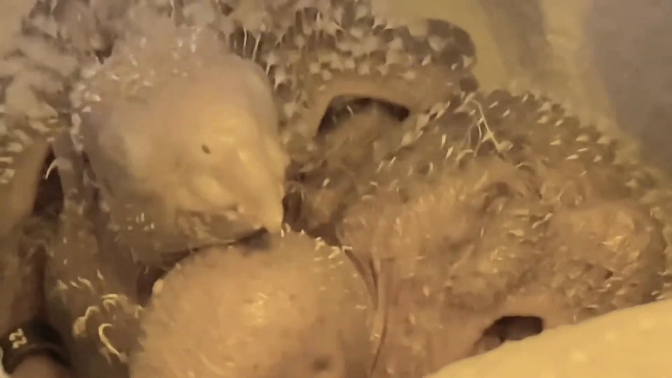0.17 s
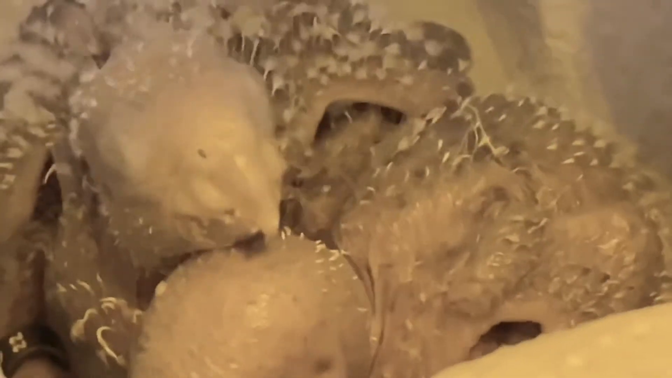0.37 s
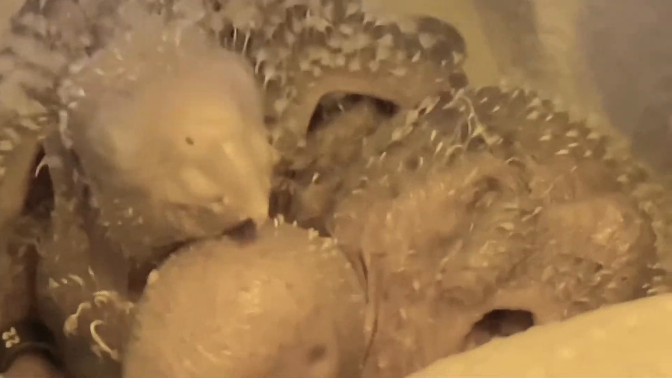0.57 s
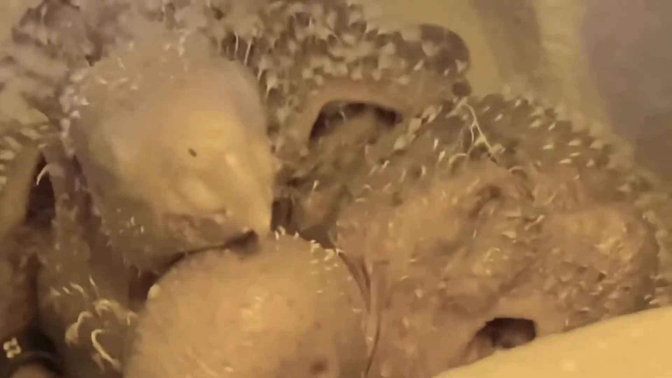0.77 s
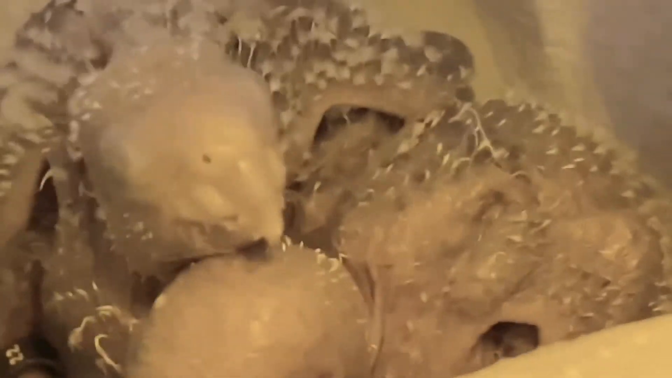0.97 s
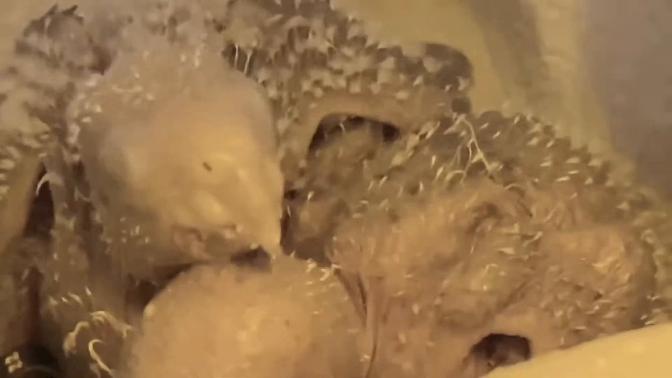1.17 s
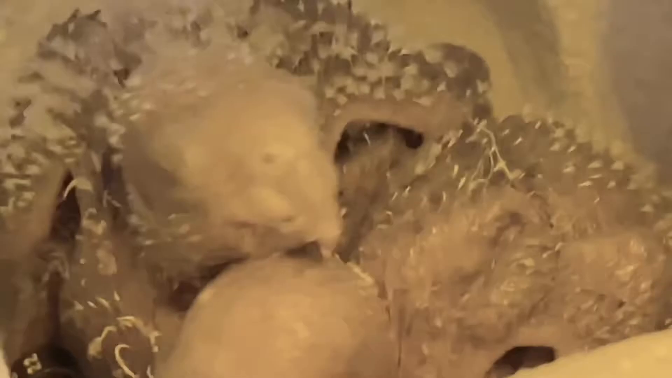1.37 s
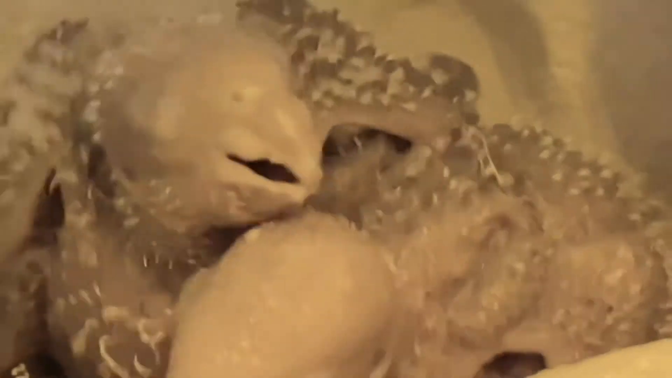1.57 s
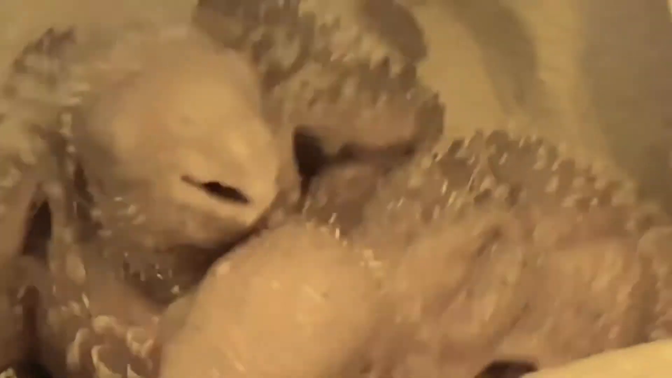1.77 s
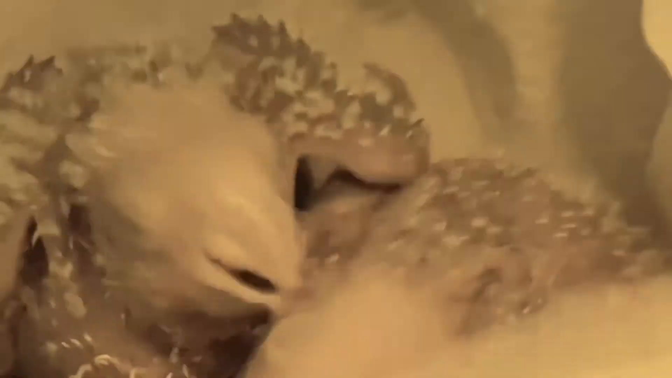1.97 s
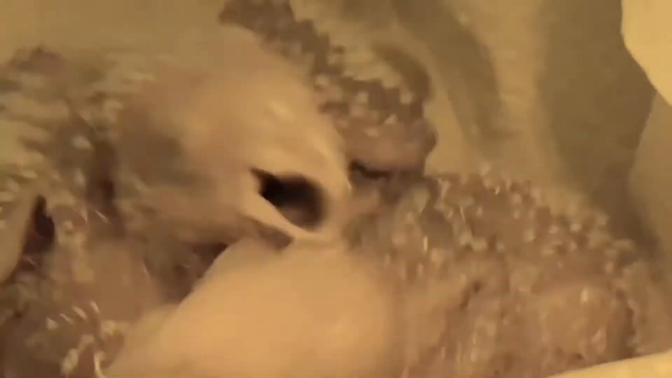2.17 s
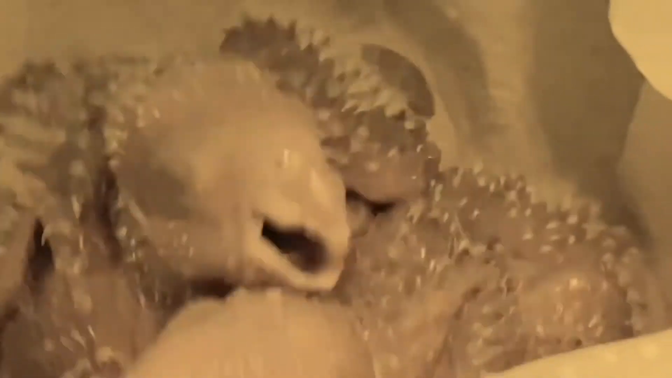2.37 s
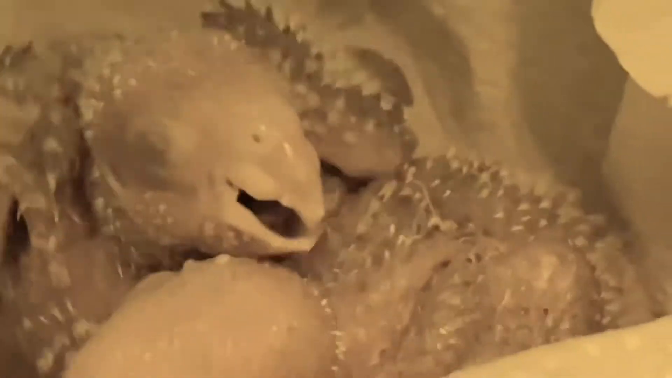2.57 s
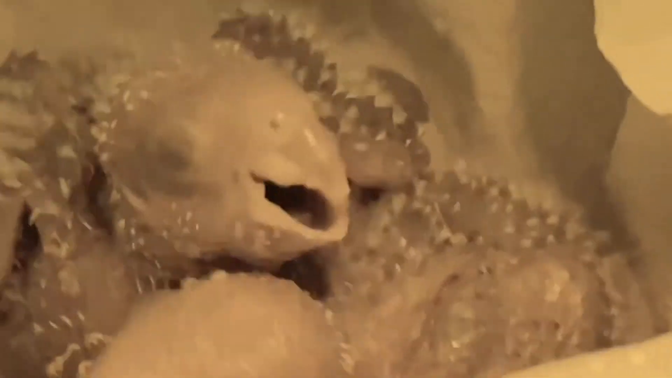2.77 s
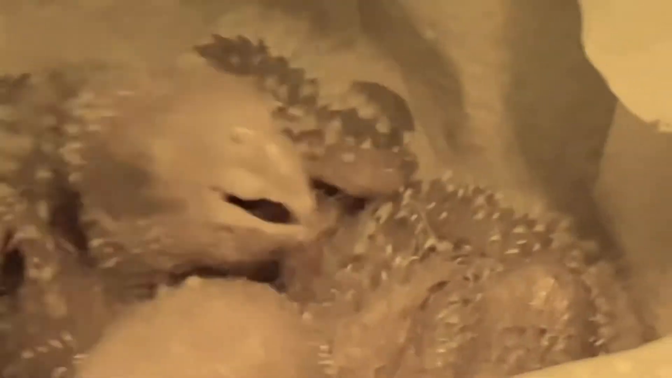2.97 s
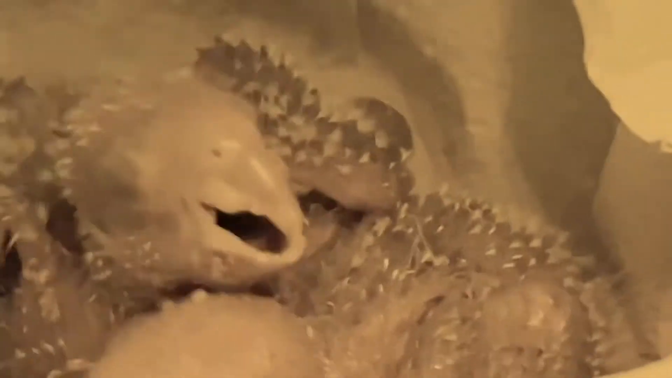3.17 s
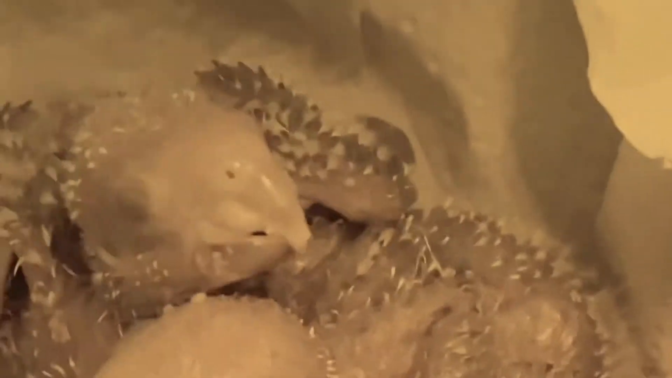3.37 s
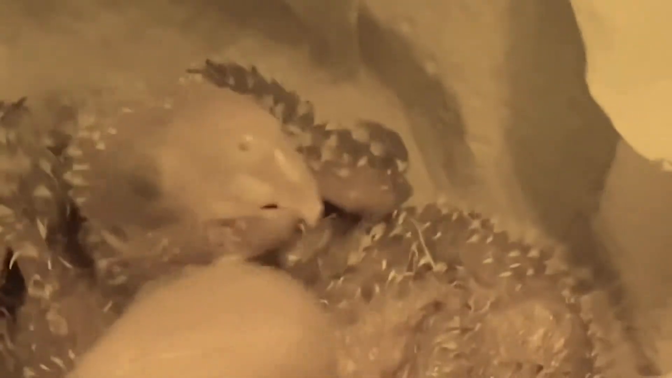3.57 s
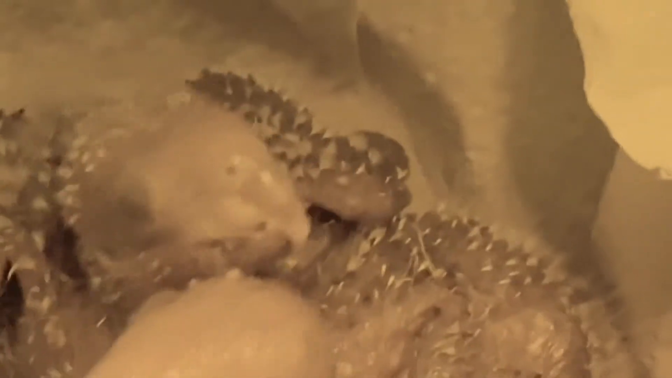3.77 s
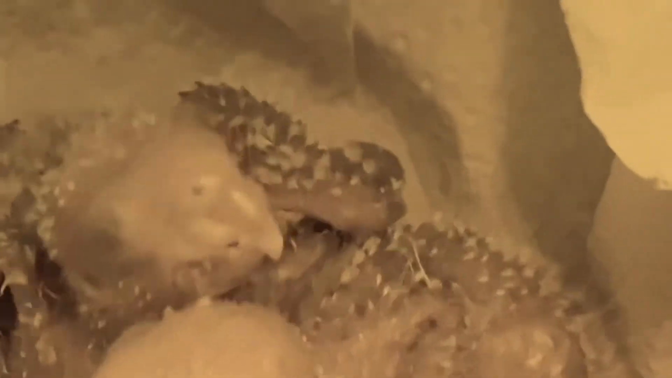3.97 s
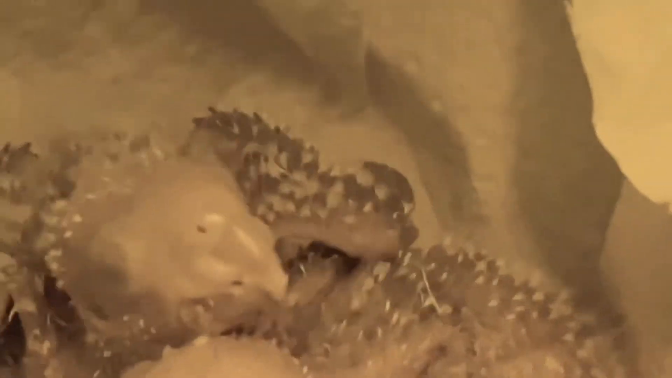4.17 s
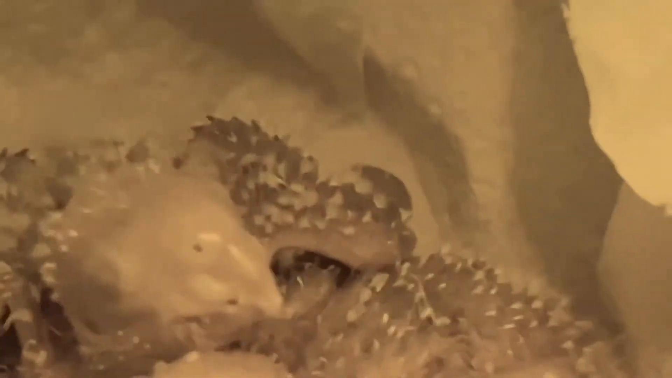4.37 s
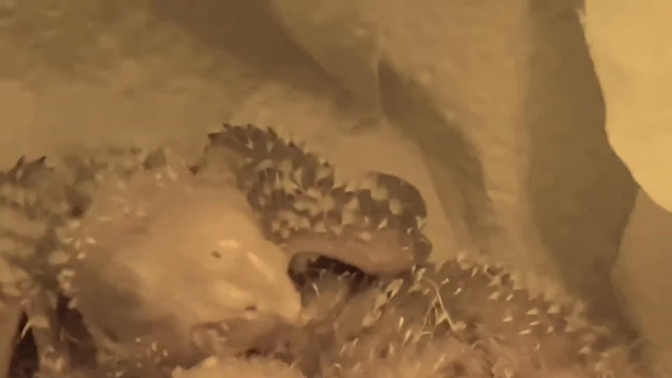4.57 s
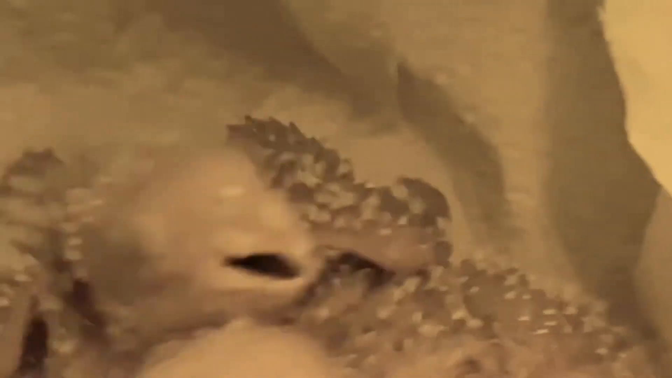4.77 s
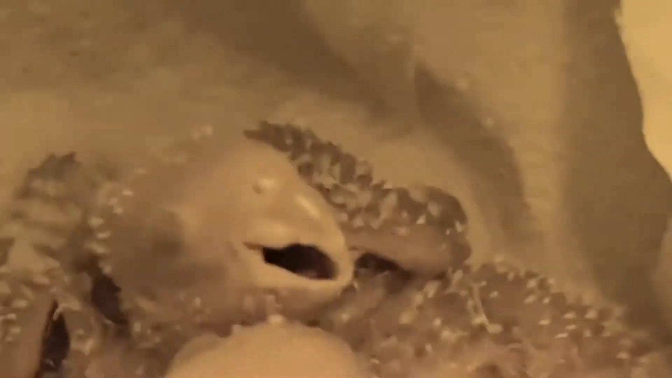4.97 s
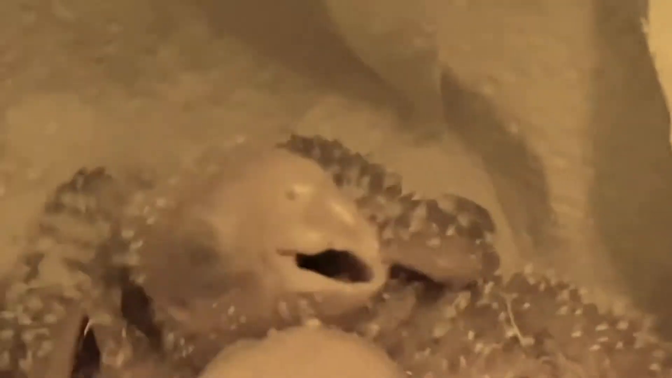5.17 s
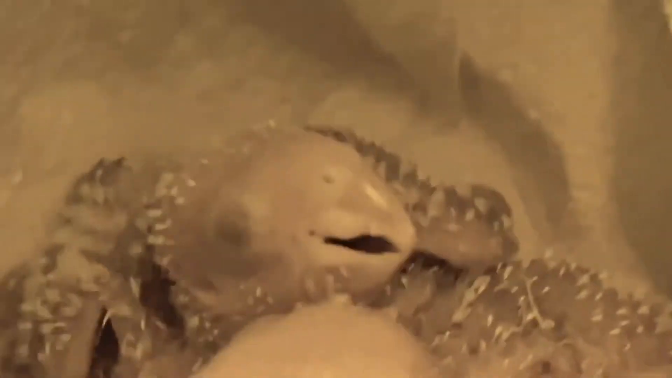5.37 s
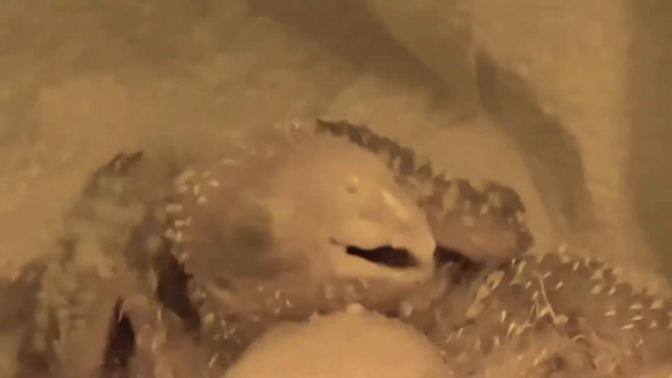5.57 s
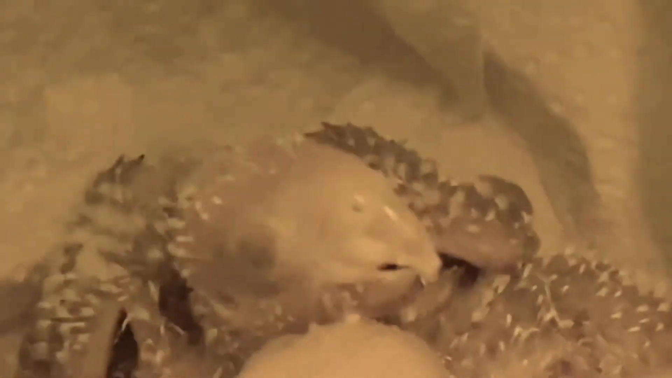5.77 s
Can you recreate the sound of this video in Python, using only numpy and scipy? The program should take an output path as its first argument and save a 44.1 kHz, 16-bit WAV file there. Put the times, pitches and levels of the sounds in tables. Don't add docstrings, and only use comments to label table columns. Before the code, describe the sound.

A faint, low, unsteady fan hum with a little soft air runs throughout, in a small box with only a very short reflection from near walls; the microphone is a hand's breadth away. Until 1.4 seconds there is almost nothing else, just soft dull knocks near 0.8 and 1.2 and a tiny tick. From 1.4 to 3.2 a parrot chick begs about eight or nine times a second: each chirp is a grainy rasp of fast pulses, locking into a piercing arched whistle with a bright overtone, then falling raggedly. Small squeaky indrawn breaths fill the gaps, and a second chick adds thin, fluttering high notes. Low bumps cluster around 2 seconds. From 3.3 to 4.7 the calls stop; faint downy rustling and dry ticks show over the hum. The second bout, nine chirps, runs from 4.7 to 5.7, growing hoarser, and ends in slight rustle and hum.

```python
import sys
import numpy as np
from scipy import signal
from scipy.fft import rfft, irfft, next_fast_len
from scipy.io import wavfile
from scipy.ndimage import uniform_filter1d, map_coordinates

SR = 44100
rng = np.random.default_rng(int(sys.argv[2]) if len(sys.argv) > 2 else 0)


def generate_wav(sig):
    pcm = np.round(np.clip(np.atleast_2d(sig).T, -1, 1) * 32767).astype(np.int16)
    wavfile.write(sys.argv[1], SR, pcm)


def how_loud(loudness_db):
    steps = np.asarray(loudness_db, float) / 20
    return 10 ** steps


N = 257103

# time in seconds, hum level in dB, air level in dB.
FAN_LEVELS = [(0.0, -48.5, -55), (1.38, -47, -54.5), (2.0, -44.5, -48.5), (2.32, -51, -57),
              (5.2, -48.5, -54), (5.6, -49.5, -56), (5.83, -45.5, -51)]
# frequency in Hz, density in dB per Hz.
HUM_SPECTRUM = [(12, -60), (25, -28), (39, -14.5), (75, -6.5), (104, -2), (114, 5.5), (124, -2), (140, -13),
                (220, -19.5), (290, -41), (480, -120)]
# frequency in Hz, density in dB per Hz.
AIR_SPECTRUM = [(100, -30), (170, -3), (282, -6.5), (469, -6), (973, -18.5), (1160, -22.5), (1330, -29),
                (1640, -23), (1790, -28), (2900, -33.5), (3600, -42.5), (6000, -59.5), (7800, -86.5),
                (13200, -120)]
WHINE_HZ, WHINE_DB = 460, -18.5
# time in seconds, level in dB.
RUSTLE_SPELLS = [
    [(1.3, -96), (1.358, -94), (1.38, -79)],
    [(3.27, -75.5), (3.61, -75), (3.7, -79), (3.84, -70.5), (3.96, -69.5), (4.028, -81.5), (4.06, -71),
     (4.41, -67.5), (4.54, -76.5), (4.66, -66), (4.676, -73.5), (4.71, -92)],
    [(5.69, -63), (5.74, -62.5), (5.778, -57.5), (5.83, -62.5)],
]
# frequency in Hz, density in dB per Hz.
DOWN_SPECTRUM = [(1470, -24.5), (2500, -6), (4000, -10.5), (7230, -12), (9020, -7.5), (10100, -13),
                 (11000, -4), (12000, -13), (13200, -40)]
# start in seconds, peak level in dB.
TICKS = [(1.2212, -56), (3.7117, -52), (3.8454, -48), (3.9119, -45), (3.945, -50), (4.1294, -63.5),
         (4.2298, -50), (4.6414, -47)]
# start in seconds, peak level in dB, pitch in Hz.
KNOCKS = [(0.83, -45.5, 103), (1.19, -32, 76.9), (1.489, -35.5, 101.8), (1.62, -31.5, 72.06),
          (1.896, -43, 116), (2.009, -26, 138.8), (2.048, -34, 62.16), (2.137, -34, 61.9),
          (2.179, -41.5, 51.1), (4.429, -40.5, 126), (5.322, -33.5, 64.9)]
# frequency in Hz, time to fall 60 dB in seconds.
WALL_DECAY = [(500, 0.2), (5000, 0.063), (11500, 0.045), (14000, .015)]
# frequency in Hz, density in dB per Hz.
BREATH_SPECTRUM = [(800, -39.5), (2000, -16.5), (4000, -5), (5500, 6.5), (8000, -6), (9900, -14.5),
                   (10600, -3), (11500, -3), (12100, -27), (14000, -49.5), (17000, -67)]

# time in seconds, pitch in Hz, level in dB.
THIN_NOTES = [
    [(1.458, 4850, -53), (1.468, 4898, -66), (1.474, 5310, -79), (1.492, 5347, -68)],
    [(1.66, 5151, -60), (1.662, 5151, -66), (1.686, 5535, -61)],
    [(1.752, 5170, -42), (1.758, 5255, -53), (1.78, 5315, -63), (1.786, 5274, -59)],
    [(2.528, 5080, -26), (2.538, 5345, -52.5), (2.548, 5250, -42.5), (2.586, 5535, -41.5)],
    [(2.648, 5080, -29), (2.672, 5350, -42), (2.71, 5170, -37), (2.714, 5178, -40)],
    [(2.778, 5246, -37.5), (2.786, 5053, -30.5), (2.795, 5090, -48.5)],
    [(4.99, 5350, -55), (4.996, 5228, -64), (5.02, 5240, -88)],
    [(5.198, 5075, -42), (5.225, 5040, -38.5), (5.252, 5390, -39.5)],
    [(5.308, 5240, -35.5), (5.346, 5276, -42.5), (5.358, 5390, -38), (5.367, 5620, -42.5)],
    [(5.55, 4950, -34), (5.576, 5410, -41.5), (5.602, 5410, -34.5), (5.612, 4850, -35)],
]
# time in seconds, pitch in Hz, level in dB.
BEATING_NOTES = [
    [(2.598, 4780, -35), (2.62, 5130, -38), (2.637, 5154, -36)],
    [(5.272, 4806, -36), (5.285, 4750, -36), (5.297, 4760, -40)],
]
TIRING_SPAN = (5.4, 5.55)

# start in seconds, held time in seconds, pitch in Hz, level in dB.
SQUEAKS = [(1.764, 0.016, 978, -55), (1.8712, 0.0063, 953, -43), (2.0744, 0.019, 1090, -32.5),
           (2.1869, 0.031, 1049, -39), (2.321, 0.012, 1031, -44.5), (2.4314, 0.02, 1077, -41.5),
           (2.5527, 0.011, 1065, -40), (2.6699, 0.024, 1075, -39.5), (2.796, 0.024, 1090, -38),
           (2.929, 0.029, 1090, -37.5), (3.074, 0.015, 1032, -40), (3.201, 0.044, 1117, -34.5),
           (5.1039, 0.01304, 967, -44.5), (5.217, 0.022, 997, -45), (5.335, 0.02, 1032, -46.5),
           (5.45, .013, 1038, -42.5), (5.572, 0.014, 980, -41), (5.7, 0.017, 1056, -37.5)]
CREST_S, ARCH_PER_S2 = .024, 180
# frequency in Hz, gain in dB.
BEAK_GAIN = [(700, -4), (1100, -6.5), (2200, -12), (3300, -3.5), (4400, 6.5), (5500, -9), (6640, -6),
             (8170, -6.5), (10000, -20.5), (11400, -16.5), (13000, -44), (16000, -70)]

# start in seconds, rasp level in dB, overtone level in dB.
CHIRPS = [(1.402, -44, -20), (1.4963, -23, -18.5), (1.5938, -22, -20.5), (1.69, -18.5, -23.5),
          (1.7891, -17, -20.5), (1.8931, -17.5, -19.5), (1.9956, -18, -14), (2.107, -15, -13),
          (2.2333, -19, -18.5), (2.35, -24, -20), (2.4681, -25, -18.5), (2.5847, -23, -21),
          (2.714, -22.5, -17.5), (2.8424, -22.5, -18), (2.9822, -21, -13.5), (3.113, -21.5, -13.5),
          (4.716, -24.5, -15.5), (4.823, -20.5, -13), (4.925, -21, -16), (5.0278, -20.5, -14.5),
          (5.137, -22, -14), (5.251, -21, -18), (5.3664, -21.5, -20), (5.4867, -22, -21), (5.612, -21, -39)]
# time in seconds, roughness 0-1, closing puff in dB, slide-in in dB.
STRAIN = [(1.4, 0.19, -43.5, -37), (1.5, 0.65, -40, -47), (1.6, 0.53, -38, -47), (1.9, 0.6, -33.5, -27.5),
          (2.05, 0.55, -29, -18.5), (2.23, 0.31, -45, -37.5), (2.6, 0.46, -33, -30.5),
          (3.11, 0.45, -32.5, -29), (4.72, .65, -30.5, -67), (4.93, 0.63, -41.5, -26.5),
          (5.25, 0.58, -45.5, -37), (5.6, 0.55, -37, -46)]
# time in seconds, top edge at the first slap in dB,
# top edge later in the rasp in dB, leak beside the whistle relative to the rasp in dB.
AIRINESS = [(1.4, 3, 0, -4), (1.5, 11, -4, -21), (1.9, 12, 2, -24.5), (2.11, 11, -8, -32),
            (2.24, -1.5, 7, -28.5), (2.47, 9, 4, -18), (2.6, -1, -6, -24), (2.85, -6, -17.5, -25.5),
            (3.12, 0.5, -20.5, -26), (4.72, -6, -9, -32.5), (4.83, 8, -20, -32), (4.93, 1, -25, -31),
            (5.14, -3, -11, -27), (5.49, 4.5, 3, -15), (5.62, -1, 5, -21)]
PAUSE_S, THIN_HZ = .5, 1700
TOP_EDGE_HZ = 12200
# centre in Hz, width in Hz, level in dB.
THROAT = [(1143, 250, -14), (2905, 325, -8), (4219, 270, 4), (5977, 950, -1.5), (7463, 890, -1),
          (10760, 1130, -4)]
# frequency in Hz, gain in dB.
RASP_EDGE = [(1330, -4), (1500, -10.5), (1750, 6.5), (2300, -1), (12300, -4.5), (13000, -8), (13700, -26.5),
             (15300, -15), (16600, -45)]
# frequency in Hz, gain in dB.
OVERTONE_GAIN = [(5000, -13), (9000, -11), (10200, -9), (10800, -1.5), (11200, -1), (11700, -9)]
# time in seconds, pitch in Hz, peak level in dB.
EARLY_WHISTLES = [
    [(1.408, 4180, -43), (1.4175, 5020, -25.5), (1.4262, 5290, -41), (1.4377, 5210, -31),
     (1.4441, 4990, -19), (1.4469, 4880, -30), (1.4499, 4500, -30)],
    [(1.5086, 4810, -35), (1.5121, 5060, -18), (1.5216, 5420, -20), (1.5305, 5450, -19),
     (1.5443, 5030, -16.0), (1.5453, 5020, -31.5), (1.5485, 4910, -24)],
    [(1.6073, 5120, -34), (1.6113, 5060, -14.5), (1.617, 5310, -26), (1.628, 5480, -15.5),
     (1.636, 5260, -24), (1.6405, 5070, -14), (1.6422, 4920, -19)],
    [(1.7031, 5070, -22), (1.7061, 5090, -13.5), (1.7188, 5420, -16), (1.7265, 5367, -16.5),
     (1.7373, 5043, -10), (1.7388, 5000, -24), (1.741, 5050, -14.5)],
    [(1.8049, 5047, -23), (1.8094, 5106, -10), (1.8146, 5330, -23), (1.8226, 5477, -16.0),
     (1.8301, 5390, -20.5), (1.8361, 5070, -11.5), (1.8398, 4830, -17)],
    [(1.9082, 5030, -30.5), (1.9139, 5084, -11), (1.9209, 5310, -19.5), (1.9294, 5320, -21.5),
     (1.9391, 5210, -16.5), (1.9416, 5075, -12.5), (1.9461, 4750, -21)],
    [(2.0114, 4960, -27), (2.0171, 5131, -12), (2.0196, 5230, -15.5), (2.0328, 5466, -18.5),
     (2.0401, 5420, -14.5), (2.0433, 5316, -9.5), (2.0468, 4880, -14)],
    [(2.1247, 4760, -22.5), (2.1279, 5170, -12.5), (2.1322, 5520, -9.5), (2.1342, 5530, -17.5),
     (2.1529, 5474, -23.5), (2.1571, 5240, -12), (2.1586, 4960, -17.5)],
]
# time in seconds, pitch in Hz, peak level in dB.
MIDDLE_WHISTLES = [
    [(2.2519, 4840, -24), (2.2576, 5470, -24.5), (2.2611, 5610, -8.5), (2.2703, 5720, -8.5),
     (2.2821, 5767, -12), (2.2871, 5440, -29.5), (2.289, 5290, -19)],
    [(2.3666, 5047, -25.5), (2.3736, 5450, -29), (2.3831, 5667, -17), (2.3908, 5660, -16),
     (2.395, 5650, -15.5), (2.3983, 5480, -29.5), (2.4008, 5250, -19)],
    [(2.4863, 5080, -22), (2.4945, 5450, -27), (2.4985, 5590, -15.5), (2.507, 5757, -22.5),
     (2.5135, 5640, -20.5), (2.5165, 5520, -18), (2.5192, 5360, -20.5)],
    [(2.6036, 4845, -26.5), (2.6076, 5163, -19), (2.6153, 5430, -33.5), (2.6203, 5530, -15.5),
     (2.628, 5680, -16.5), (2.6348, 5600, -20), (2.6405, 5270, -18)],
    [(2.7323, 4964, -28), (2.737, 5190, -18), (2.754, 5650, -17), (2.7612, 5480, -14), (2.7635, 5390, -34),
     (2.7652, 5320, -13.5), (2.7672, 5090, -20.5)],
    [(2.863, 5015, -39), (2.864, 5120, -20), (2.8834, 5615, -16.5), (2.8914, 5550, -15.5),
     (2.8952, 5390, -29.5), (2.8964, 5340, -17.5), (2.8979, 5190, -17.5)],
    [(3.0097, 5225, -18), (3.0174, 5350, -16.5), (3.0209, 5530, -22.5), (3.0239, 5556, -15.0),
     (3.0359, 5563, -14), (3.0389, 5480, -17.5), (3.0436, 5120, -14)],
    [(3.1389, 4940, -25.5), (3.1429, 5156, -17.5), (3.1576, 5460, -17), (3.1631, 5570, -21),
     (3.1673, 5470, -37), (3.1693, 5380, -12), (3.1728, 5030, -19)],
]
# time in seconds, pitch in Hz, peak level in dB.
LATE_WHISTLES = [
    [(4.7262, 4920, -29), (4.7289, 5110, -22), (4.7379, 5420, -25), (4.7571, 5510, -15.5),
     (4.7733, 5380, -27), (4.7798, 5090, -15.5), (4.7841, 4740, -21)],
    [(4.837, 4960, -21), (4.8422, 5230, -17.5), (4.8522, 5550, -27), (4.8642, 5740, -10.5),
     (4.8689, 5630, -12.5), (4.8704, 5560, -19.0), (4.8759, 4990, -18.5)],
    [(4.9385, 5140, -24), (4.9415, 5230, -18.5), (4.952, 5570, -19), (4.9619, 5700, -12.5),
     (4.9699, 5450, -22.5), (4.9732, 5240, -15), (4.9764, 4980, -21)],
    [(5.04, 5110, -30.0), (5.045, 5200, -17.5), (5.054, 5480, -25), (5.0629, 5610, -17.0),
     (5.0709, 5400, -28), (5.0739, 5250, -15), (5.0769, 5080, -17.5)],
    [(5.1535, 4990, -21.5), (5.163, 5330, -17), (5.1754, 5510, -21), (5.183, 5440, -18.5),
     (5.1862, 5300, -14.5), (5.1884, 5160, -22), (5.1924, 4800, -24)],
]
# time in seconds, pitch in Hz, peak level in dB.
LAST_WHISTLES = [
    [(5.2685, 5090, -27), (5.2742, 5110, -19.5), (5.2844, 5414, -16.5), (5.2904, 5450, -25.0),
     (5.2962, 5330, -15.5), (5.2979, 5130, -15), (5.3034, 5116, -27)],
    [(5.3895, 5210, -22), (5.3975, 5345, -16.5), (5.4049, 5415, -17.5), (5.4107, 5330, -15),
     (5.4154, 5170, -20.5), (5.4172, 5130, -19), (5.4204, 4890, -23)],
    [(5.509, 4940, -34), (5.5142, 5140, -13.5), (5.5217, 5300, -33), (5.5254, 5280, -15),
     (5.5347, 5265, -30), (5.5389, 5116, -15.5), (5.5469, 4860, -25)],
    [(5.6357, 5010, -35), (5.6399, 5121, -19.5), (5.6459, 5173, -13.5), (5.6534, 5310, -30),
     (5.6656, 5176, -14.5), (5.6679, 5050, -30), (5.6689, 5180, -20)],
]

# frequency in Hz, lead of the left port in radians.
PORT_LEAD = [(0, -1.5), (260, 2), (780, -1.42), (1210, -0.02), (3010, 0.5), (8700, 0.18), (9820, -2.5),
             (10500, -3.5), (11800, -6.5), (12600, -7.2), (13400, -8.3), (14400, -11.5), (14900, -13.5),
             (16500, -12)]
# frequency in Hz, left-right likeness.
PORT_LIKENESS = [(40, 0.91), (120, .45), (300, 0.054), (700, 1), (1500, 0.71), (4000, 0.7), (9000, 1)]
# frequency in Hz, left over right in dB.
PORT_TILT = [(60, -0.5), (200, -1), (380, 4.5), (700, -2), (1300, -2), (2400, 0.5), (4400, 0), (9000, 0),
             (12000, 0)]


def unit(x):
    return x / np.sqrt(np.mean(x ** 2) + 1e-20)


def along(points, hz):
    f, v = np.transpose(points)
    return np.interp(np.log(hz + 1), np.log(f + 1), v)


def track(times, values):
    return np.interp(np.arange(N) / SR, np.ravel(times), np.ravel(values))


def wobble(rate):
    knots = rng.standard_normal(int(N * rate / SR) + 4)
    return map_coordinates(knots, [np.arange(N) * rate / SR], order=2)


def filtered(x, response):
    m = next_fast_len(N + 8192)
    return irfft(rfft(x, m) * response(np.fft.rfftfreq(m, 1 / SR)), m)[..., :N]


def turns(hz):
    return 2 * np.pi * np.cumsum(hz) / SR


def columns(table):
    return np.transpose(table)[:, :, None]


def at_calls(table, start):
    s, *values = np.transpose(table)
    return [np.interp(start, s, v) for v in values]


def rush(spectrum, patchy_db):
    z = signal.stft(rng.standard_normal((2, N + 512)), nperseg=512)[2]
    field = uniform_filter1d(rng.standard_normal(z.shape[1:]), 5, 0)
    field = uniform_filter1d(field, 8, 1)
    pair = signal.istft(z * how_loud(patchy_db * unit(field)), nperseg=512)[1][:, :N]

    def mid_side(hz):
        turn = np.arccos(np.clip(along(PORT_LIKENESS, hz), -1, 1)) / 2
        return how_loud(along(spectrum, hz)) * [np.cos(turn), np.sin(turn)]

    mid, side = filtered(pair, mid_side)
    return unit(np.array([mid + side, mid - side]))


def fan():
    s, hum_db, air_db = np.transpose(FAN_LEVELS)
    hum = how_loud(track(s, hum_db) + 0.45 * wobble(14)) * rush(HUM_SPECTRUM, patchy_db=-3.0)
    whine_level = how_loud(track(s, hum_db) + WHINE_DB + 2.68 * wobble(7.2))
    whine = whine_level * np.sin(turns(WHINE_HZ + 1.5 * wobble(5)))
    draught = how_loud(track(s, air_db) + .3 * wobble(1.1)) * rush(AIR_SPECTRUM, patchy_db=0.9)
    return hum + whine + draught


def rustle():
    s, db = np.vstack([(1.25, -105), *RUSTLE_SPELLS]).T
    brush_db = track(s, db) + 2.2 * wobble(39) + .4 * wobble(10)
    brush = how_loud(brush_db) * rush(DOWN_SPECTRUM, patchy_db=1.5)
    gate_db = np.full(N, -120.)
    for s, db in TICKS:
        gate_db[round(s * SR):][:300] = db - 10 - 60 * np.arange(300) / SR / .02
    dry_spectrum = [(1200, -37.5), (3200, 0.5), (6000, -13.5), (10000, -13.5), (13000, -55.5)]  # Hz, dB per Hz
    return brush + how_loud(gate_db) * rush(dry_spectrum, patchy_db=-3.5)


def bumps():
    out, t = np.zeros(N + SR), np.arange(SR // 8) / SR
    for s, db, hz in KNOCKS:
        swell = 1 - np.exp(-t / 0.0014)
        swing = how_loud(db + 6.0 - 60 * t / 0.034) * swell * np.sin(2 * np.pi * hz * t)
        out[round(s * SR):][:len(t)] += swing
    return out[:N] * how_loud([[1.5], [-1.5]])


def box(x):
    hz, t, z = signal.stft(rng.standard_normal((2, SR // 5)), SR, nperseg=128)
    decay = how_loud(-60 * t / along(WALL_DECAY, hz)[:, None])
    tail = signal.istft(z * decay, SR, nperseg=128)[1]
    return signal.fftconvolve(x[None], tail / np.linalg.norm(tail[0]), axes=1)[:, :N]


def breath():
    return unit(filtered(rng.standard_normal(N), lambda f: how_loud(along(BREATH_SPECTRUM, f))))


def held():
    notes = []
    for note in sorted(THIN_NOTES + BEATING_NOTES):
        before = (note[0][0] - .005, note[0][1], -130)
        after = (note[-1][0] + .005, note[-1][1], -130)
        notes.append([before, *note, after])
    s, hz, db = np.vstack(notes).T
    tired = track(TIRING_SPAN, [1, 2.6])
    flutter = .004 * wobble(70) + tired * (.012 * wobble(260) + .009 * wobble(1500))
    phase = turns(track(s, hz) * (1 + flutter))
    hoarse = how_loud(-11 + 4 * wobble(300)) * np.sin(2 * phase) + how_loud(-20) * breath()
    return how_loud(track(s, db) + 6 + 1.4 * wobble(250)) * (np.sin(phase) + hoarse)


def squeaks():
    s, held_s, first_hz, db = columns(SQUEAKS)
    end = s + held_s
    times = np.hstack([s - .002, s + .002, s + .6 * held_s, end, end + .013, end + .017])
    from_crest = track(times, times - s - np.clip(held_s - CREST_S, .002, None))
    pitch = track(times, first_hz + 0 * times) * (1 - ARCH_PER_S2 * from_crest ** 2)
    level = track(times, db - [51, 2, 0.095, 8.9, 26, 80.5])
    closing = track(times, np.ones_like(s) * [0.602, .3, .6, 2.7, 12.84, 6])
    closing = closing + track(times, .12 * np.clip(-42 - db, 0, 30) + 0 * times)
    phase = turns(pitch * (1 + 0.004 * wobble(400)))
    stack = 0
    for k in range(1, 12):
        overtone_db = along(BEAK_GAIN, k * pitch) - (k - 2.5) * closing + 3 * wobble(180)
        stack = stack + how_loud(overtone_db) * np.sin(k * phase + .8 * k * k)
    return how_loud(level - 1.5) * (stack + how_loud(-17) * breath())


def throat(f):
    response = 0
    for k, (centre, width, db) in enumerate(THROAT):
        resonance = 1j * f * width / (centre * centre - f * f + 1j * f * width)
        response = response + (-1) ** k * how_loud(db) * resonance
    return response


def rasp(start, onset, rasp_db, off):
    spike_db, edge_db, _ = at_calls(AIRINESS, start)
    rough, _, _ = at_calls(STRAIN, start)
    times = np.hstack([start - .002, start - .0005, start + 0.0018,
                       onset - .005, onset - 0.0003, onset + .003, onset + 0.007])
    pitch = track(times, np.ones_like(start) * [1090, 1090, 1144.0, 1462, 1759, 1891, 1893])
    rough = np.clip(track(times, rough * [.35, .35, .35, .95, 1.3, 1.3, 1.3]), 0, 1)
    phase = turns(pitch * (1 + 0.027 * wobble(40) + (0.005 + .04 * rough) * wobble(900)))
    slaps = sum(np.cos(k * phase + 0.55 * k * k) for k in range(1, 12))
    slaps = unit(slaps) * how_loud(1.65 * wobble(700))
    gated = unit(rng.standard_normal(N) * (2.0 + np.cos(phase)))
    source = np.sqrt(1 - rough) * slaps + np.sqrt(rough) * gated
    voice = unit(filtered(source, lambda f: throat(f) * how_loud(along(RASP_EDGE, f))))
    first = track(times, (np.diff(start, axis=0, prepend=0) > PAUSE_S) + 0 * times)
    voice = voice - first * filtered(voice, lambda f: 1 / (1 + (f / THIN_HZ) ** 8))
    top_db = track(times, np.hstack([spike_db + [3, 3, 3.5], edge_db - [-2.5, 5.0, 6, 6]]))
    voice = voice + (how_loud(top_db) - 1) * filtered(voice, lambda f: f > TOP_EDGE_HZ)
    level = track(times, np.hstack([off, rasp_db - [20.5, 3.0, 0.83, 5.5, 32.5], off]))
    return voice * how_loud(level)


def whistle(start, onset, knee, curves, over_db, off):
    s, hz, db = curves
    _, _, slide_db = at_calls(STRAIN, start)
    fall = knee + [.0035, .0055, .0085, .013, .016]
    times = np.hstack([start, start + 0.002, onset - .004, s, fall])
    collapse = hz[:, -1:] * [.9, .69, .52, .41, .38]
    pitch = track(times, np.hstack([2600 + 0 * start, 3100 + 0 * start, hz[:, :1], hz, collapse]))
    pitch = uniform_filter1d(pitch, size=150)
    ragged = track(times, np.ones_like(start) * [.05, .05, .04, 0, 0, 0, 0, 0, 0, .1, .5, .9, .9, .9, .9])
    phase = turns(pitch * (1 + .004 * wobble(500) + .07 * ragged * wobble(800)))
    dying_db = np.minimum(db[:, -1:], -23) - [9, 21, 29, 38, 100]
    level = track(times, np.hstack([off, slide_db - 7.5, slide_db, db, dying_db]))
    locked = track(times, np.ones_like(start) * ([0] * 3 + [1] * 7 + [0] * 5)) == 1
    size = np.where(locked, track(s, how_loud(db)), how_loud(level))
    note = size * how_loud(0.86 + (1.5 + 8 * ragged) * wobble(450)) * np.sin(phase)
    octave_db = over_db - [7.4, 4, 1.52, .1, 0.11, 1.5, 8.4, 14, 16, 26, 40, 90]
    over = track(times, np.hstack([off, slide_db, slide_db + 3.5, octave_db]))
    over = over + 1.0 + along(OVERTONE_GAIN, 2 * pitch) + 3.2 * wobble(300)
    return note + how_loud(over) * np.sin(2 * phase)


def leak(start, onset, knee, rasp_db, off):
    _, _, leak_db = at_calls(AIRINESS, start)
    _, puff_db, _ = at_calls(STRAIN, start)
    times = np.hstack([start, onset, knee - .004, knee + .003, knee + 0.011, knee + 0.021, knee + 0.024])
    level = track(times, np.hstack([off, rasp_db - 17.5, rasp_db + leak_db,
                                    puff_db + 6.5, puff_db + 0.5, puff_db - 27.5, off]))
    return breath() * how_loud(level + 0.65 * wobble(405))


def chirps():
    start, rasp_db, over_db = columns(CHIRPS)
    calls = EARLY_WHISTLES + MIDDLE_WHISTLES + LATE_WHISTLES + LAST_WHISTLES
    curves = np.transpose(calls, (2, 0, 1))
    s = curves[0]
    onset, knee = s[:, :1] + .002, s[:, -1:] - .002
    off = np.full_like(start, -120)
    voiced = rasp(start, onset, rasp_db, off) + whistle(start, onset, knee, curves, over_db, off)
    return voiced + leak(start, onset, knee, rasp_db, off)


def scene():
    chicks = chirps() + squeaks() + held()
    walls = how_loud(-16) * box(chicks)
    return chicks + walls + fan() + rustle() + bumps()


def low_pass(x):
    return signal.sosfilt(signal.butter(12, 16960, fs=SR, output="sos"), x)


def record(dry):
    def half(f):
        lead = np.interp(f, *np.transpose(PORT_LEAD))
        return how_loud(along(PORT_TILT, f) / 2) * np.exp(.5j * lead)

    ports = filtered(dry, lambda f: np.array([half(f), 1 / half(f)]))
    return low_pass(ports)


dry = scene()
out = record(dry)
generate_wav(out)
```